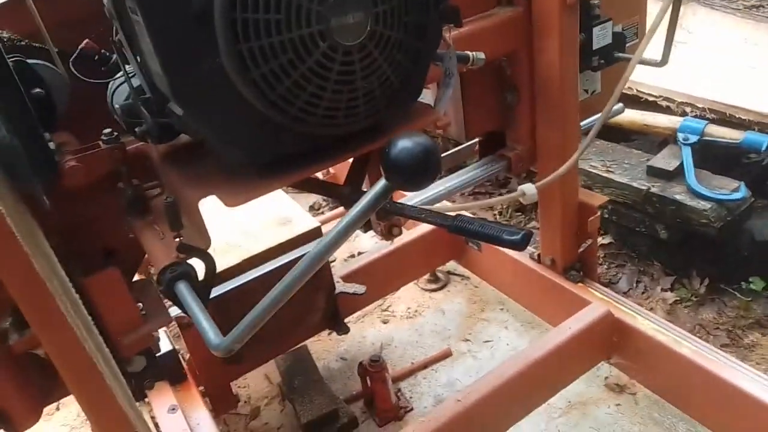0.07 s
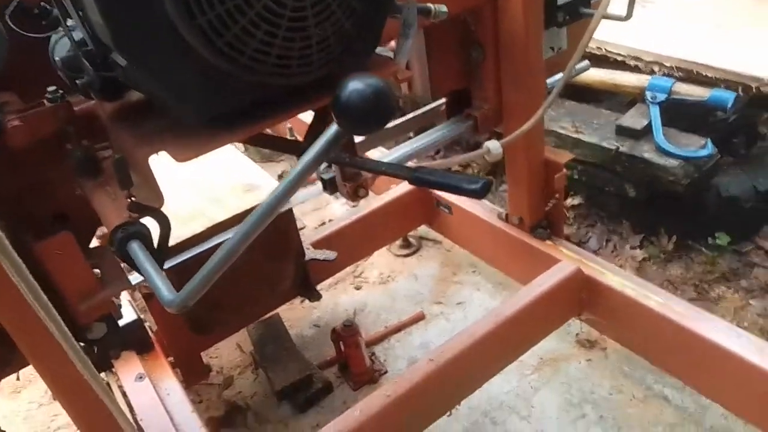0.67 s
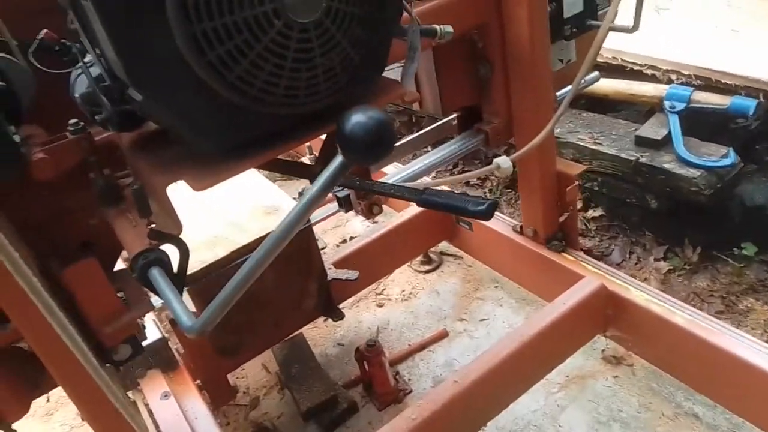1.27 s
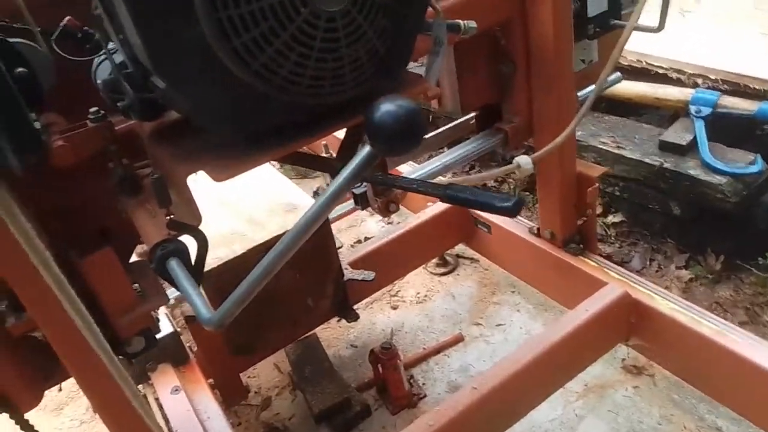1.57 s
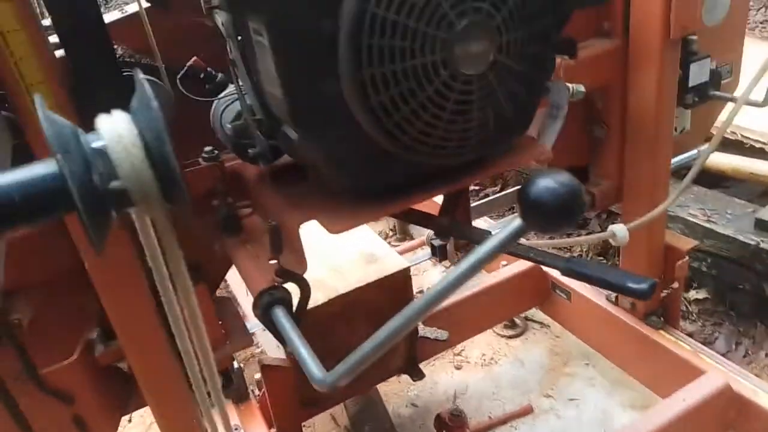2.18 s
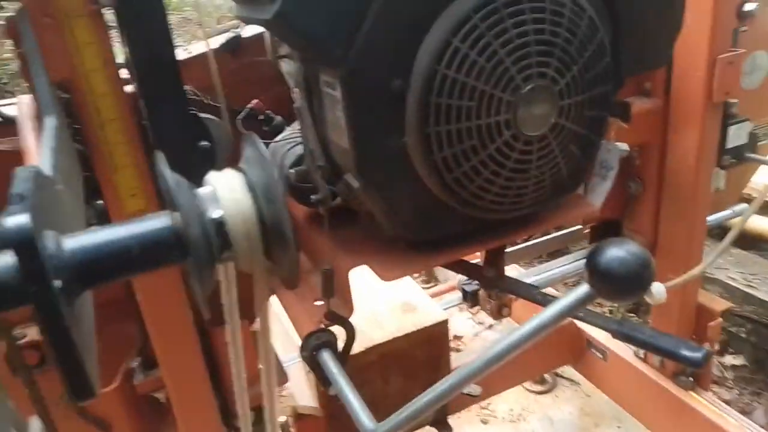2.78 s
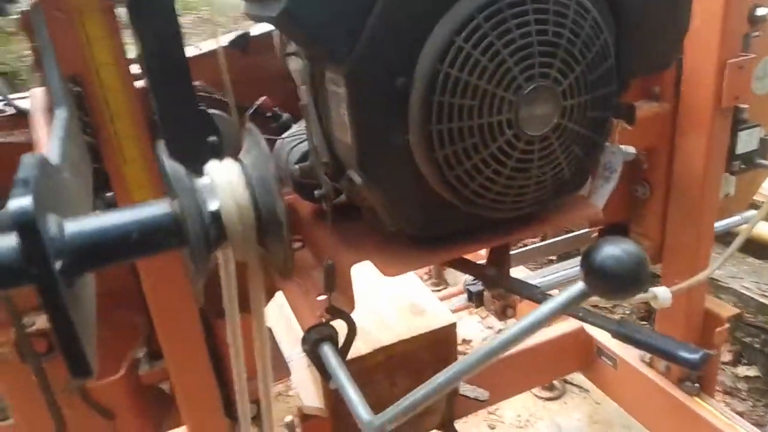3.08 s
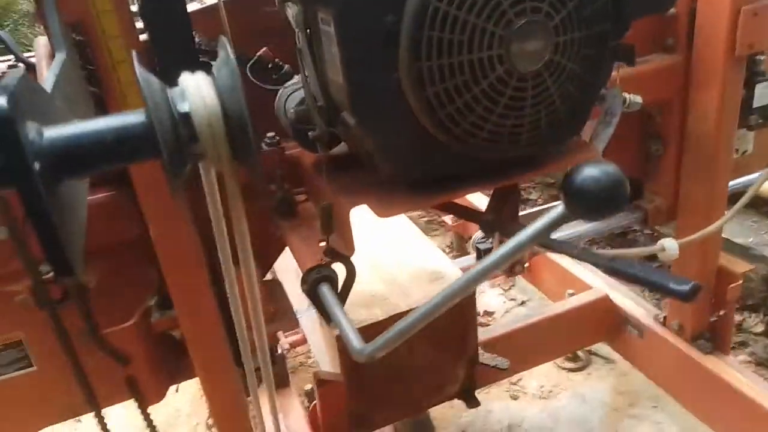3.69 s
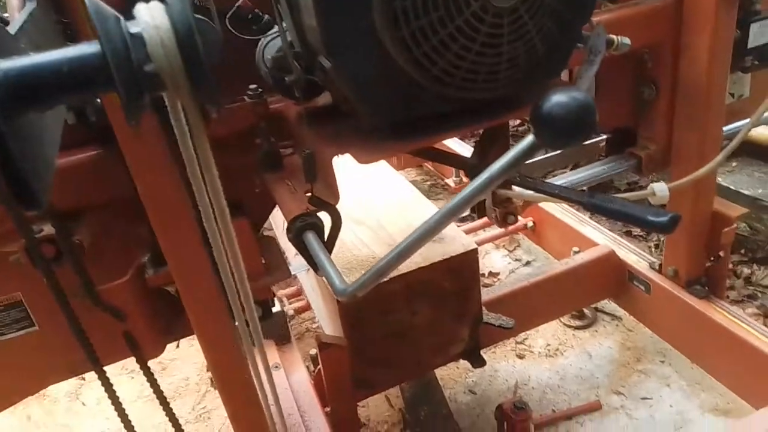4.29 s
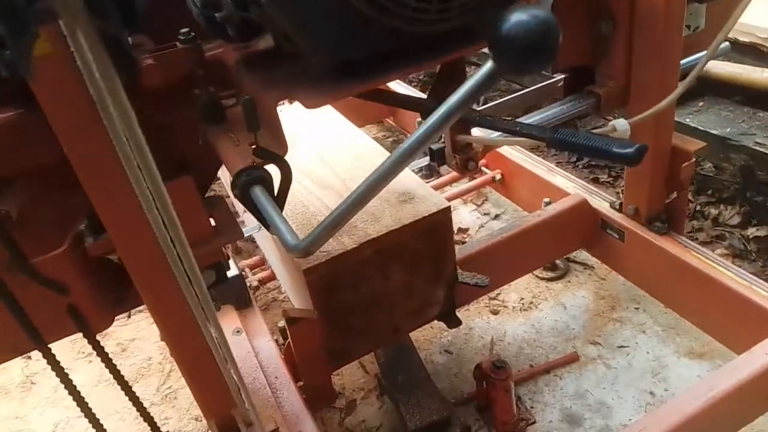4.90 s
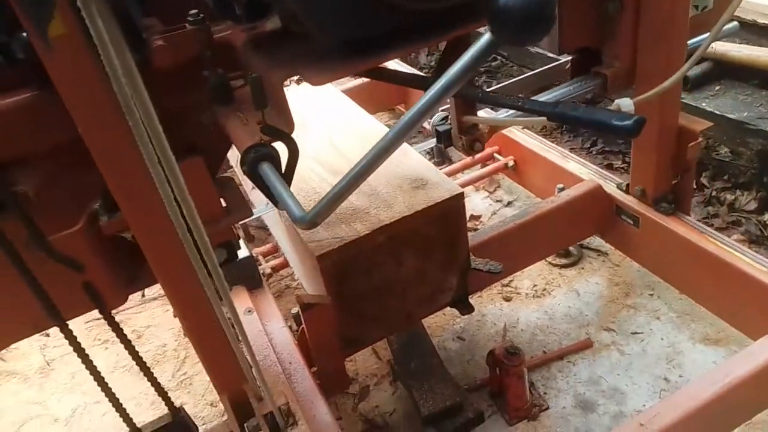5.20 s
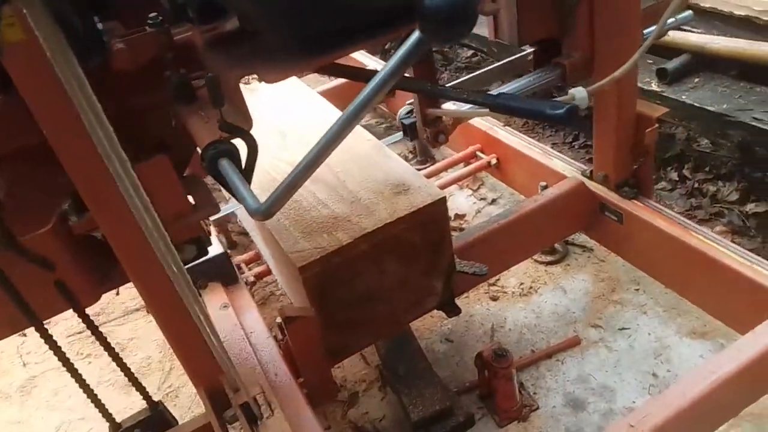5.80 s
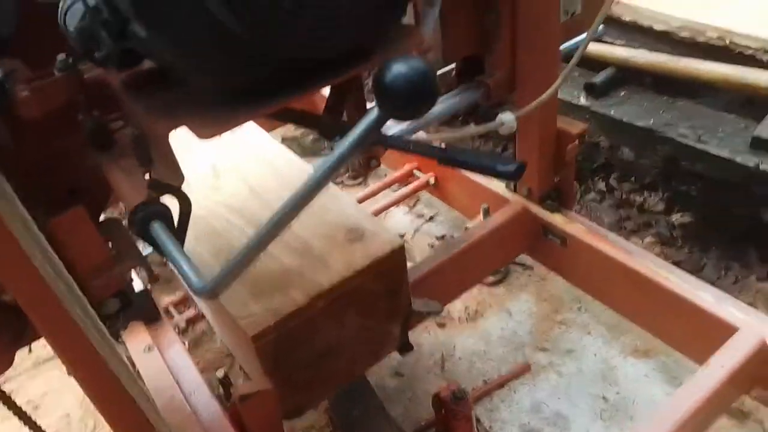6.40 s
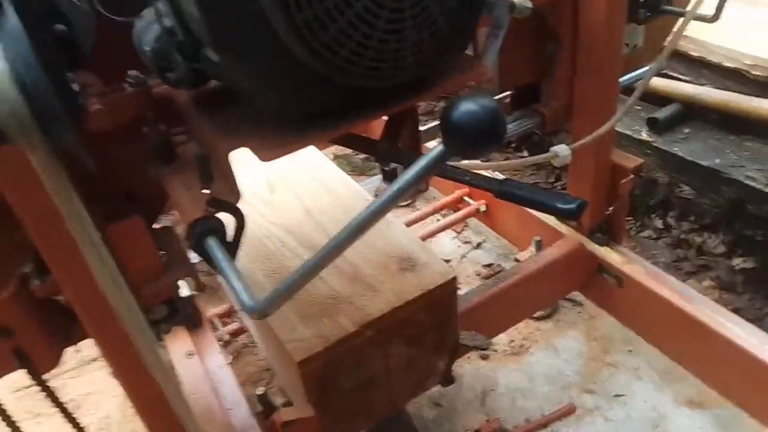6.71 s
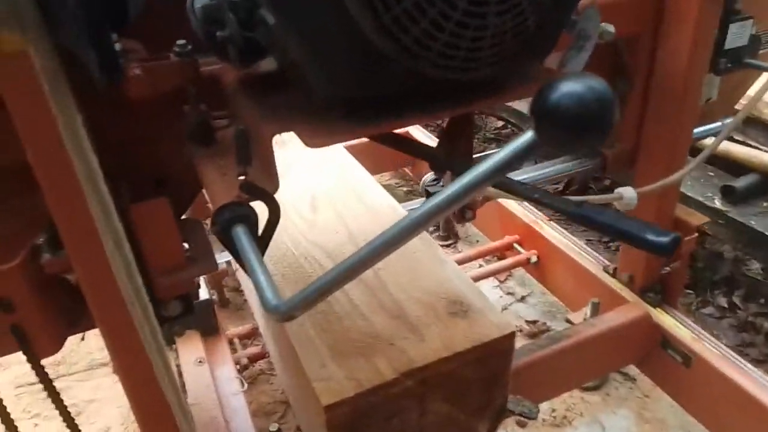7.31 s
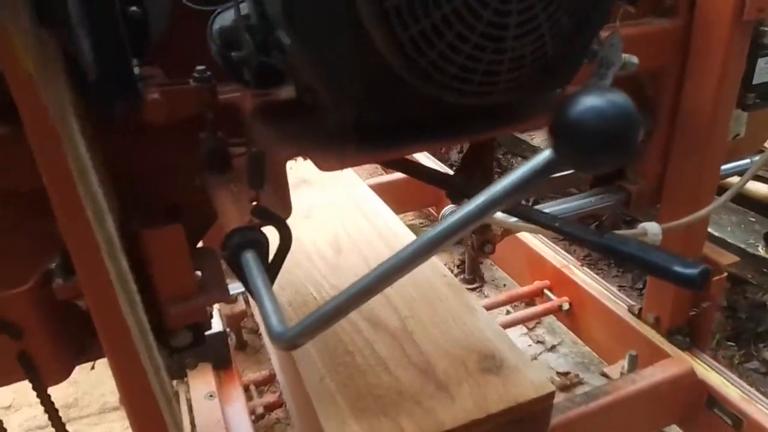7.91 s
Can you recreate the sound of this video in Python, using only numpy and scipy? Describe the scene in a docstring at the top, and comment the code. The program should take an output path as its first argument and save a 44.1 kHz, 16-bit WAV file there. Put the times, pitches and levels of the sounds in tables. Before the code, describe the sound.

A petrol engine clatters, then drones under load as a sawmill's band blade bites into wood with a piercing whine and hiss.

```python
"""Bandsaw mill entering a log

A portable bandsaw mill, heard outdoors from beside its twin-cylinder petrol engine, starts a cut.
Friction excites the steel band's bending modes: it whines over its guides and squeals as it enters
the wood, where fracturing fibres add a loud sawing hiss. The governor holds the speed and opens the
throttle, so the loose engine clatter firms into a harmonic exhaust drone."""
import sys
import numpy as np
from scipy import signal
from scipy.fft import rfft, irfft, next_fast_len
from scipy.io import wavfile
from scipy.ndimage import uniform_filter1d

SR = 44100
rng = np.random.default_rng(int(sys.argv[2]) if len(sys.argv) > 2 else 0)


def unload_wav(signal):
    """Save mono or channel-first audio to the path in sys.argv[1] as 16-bit WAV at rate SR, clipped to [-1, 1]."""
    wavfile.write(
        sys.argv[1],
        SR,
        np.round(np.clip(np.atleast_2d(signal).T, -1, 1) * 32767).astype(np.int16),
    )


N = 355005
TIME = np.arange(N) / SR
ENTRY_S = 1.55  # the load is half-way up as the band enters the log

# feed into the log: (time [s], level of the teeth at full load [dB])
FEED_LEVELS = [(0, -11), (1.4, -16), (2.3, -16.5), (3.6, -14.5), (4.3, -17), (5.8, -17), (6.8, -17),
               (8.05, -17)]
# spectrum of tearing wood: (frequency [Hz], relative level [dB])
TEARING_SPECTRUM = [(2500, -44), (3500, -10.5), (4350, -7), (5200, -7.5), (6000, -5), (6900, 0),
                    (7900, 1.5), (8800, -0.5), (9400, 3), (9900, -5), (10800, -7), (12500, -10.5),
                    (14000, -6), (16000, -12)]
def teeth(cycle, load, laps_per_cycle=0.21):
    """Fracture noise: countless tiny breaks of fibre merge into a hiss that swells once per band lap."""
    level_db, = curves(FEED_LEVELS)
    lap = laps_per_cycle * cycle
    grain_db = 0.5 * walk(1500) + 0.38 * np.sin(2 * np.pi * lap) + 0.64 * walk(25)
    return undb(level_db) * np.sqrt(load) * colour(noise() * undb(grain_db), TEARING_SPECTRUM)


# friction on the band: (time [s], base level of the main mode [dB], base level of the whine [dB])
FRICTION_LEVELS = [(0, -21.5, -21), (.45, -21.5, -20.5), (.7, -22, -22), (1.0, -22, -20),
                   (1.45, -17.5, -18), (1.75, -20.5, -16.5), (2.2, -19, -18.5), (2.62, -14, -16),
                   (3.0, -23, -19.5), (3.7, -20, -18), (4.2, -24, -17), (4.55, -26, -18.5), (5.1, -24, -17),
                   (5.5, -28, -17), (6.25, -25, -17), (6.8, -21, -15.5), (7.3, -21, -16.5),
                   (7.65, -26, -18.7)]
def band_friction(load, main_hz=8345, screech_hz=8525, rise_hz=160.6, buried_s=4.6):
    """Stick-slip friction drives the band's modes, damped by the wood, and a screech rising with depth."""
    main_db, whine_db = curves(FRICTION_LEVELS)
    whine = undb(whine_db - 1.6 * load) * bending_modes()
    depth = np.clip((TIME - ENTRY_S) / (buried_s - ENTRY_S), 0, 1)
    screech = undb(whine_db - 5.5) * sing(screech_hz + rise_hz * depth, wander_hz=70.3 + 109.3 * load)
    main_mode = unit(ring(noise(), main_hz, width_hz=100) + 1.4 * sing(main_hz, wander_hz=36.03))
    grip_db = 0.8 * walk(14)
    whistle = undb(main_db + grip_db - 2.0 * load) * main_mode + screech
    return whine, whistle


# bending modes of the band: (frequency [Hz], bandwidth [Hz], relative level [dB])
BAND_MODES = [(7900, 280, -2.5), (8616, 330, 5), (8800, 110, -10), (8930, 120, -8), (9110, 85, -2.5),
              (9000, 120, -11), (10160, 140, -8), (11270, 70, -8), (13050, 130, -14)]
def bending_modes(flutter_db=0.7, bite_db=1.0):
    """Forced resonance: the modes take turns as the band flutters and swell together as it bites."""
    modes = sum(undb(db - flutter_db * walk(11)) * ring(noise(), hz, width)
                for hz, width, db in BAND_MODES)
    return unit(modes * undb(bite_db * walk(30)))


# pinches by guides or wood: (peak time [s], rise or fall time [s], frequency [Hz], peak level [dB])
PINCHES = [(.3, .6, 11320, -33.5), (.3, .45, 8610, -22.5), (1.17, .22, 8400, -19.5),
           (1.43, .2, 8440, -17.5), (1.56, .15, 8170, -16), (1.58, .12, 7810, -22.5),
           (1.67, .1, 8740, -19.5), (1.75, .25, 11400, -31.5), (2.0, .12, 8340, -20.5),
           (2.15, .15, 6900, -27.5), (2.58, .16, 8420, -18.5), (2.85, .25, 9100, -24.5),
           (3.45, .5, 6900, -28.5), (3.72, .2, 8580, -21), (4.15, .1, 8340, -21), (4.45, 1.0, 4340, -33),
           (4.45, .3, 7620, -27.5), (4.67, .2, 9210, -19.5), (4.7, .5, 6330, -32.5),
           (4.9, 1.0, 10280, -33.5), (5.3, .2, 11300, -31), (5.68, .12, 8720, -21),
           (6.17, .18, 8830, -16.5), (6.5, .2, 8000, -26.5), (6.95, .2, 8500, -22.5),
           (7.1, .9, 4730, -33.5), (7.65, 1.0, 7600, -25.5)]
def squeals():
    """Friction-induced vibration: each pinch swells one mode of the band and lets it go."""
    return sum(undb(db) * swell(s, side_s) * sing(hz, wander_hz=40) for s, side_s, hz, db in PINCHES)


# spectrum of the band sliding in its guides: (frequency [Hz], relative level [dB])
GUIDE_SPECTRUM = [(2000, -23.5), (4500, -7), (6000, -1), (7500, 0), (9500, 0), (11000, -1), (14000, 0.5),
                  (16000, -3)]
def guide_hiss(load, free_db=-20, pressed_db=0.5):
    """Sliding friction makes broadband noise, a little louder as wood presses the band on its guides."""
    level_db = free_db + pressed_db * load + .35 * walk(5.5) + .55 * walk(30)
    return undb(level_db) * colour(noise(), GUIDE_SPECTRUM)


# surges of the light-running clatter: (time [s], level at zero load [dB])
LIGHT_SURGES = [(0, -21), (.25, -21.5), (.52, -21), (.72, -23.5), (.85, -20.5), (1.2, -21.5), (1.55, -22),
                (2.0, -21)]
# clatter and cooling air, running light: (frequency [Hz], relative level [dB])
LIGHT_SPECTRUM = [(15, -80), (25, -50), (97, -15), (150, -13), (180, -8), (216, -7), (319, -6.5),
                  (592, -6.5), (762, -8), (1100, -9), (1480, -10.5), (4560, -12.5), (6000, -17),
                  (7800, -40), (13200, -120)]
# clatter and cooling air under load: (frequency [Hz], relative level [dB])
LOADED_SPECTRUM = [(25, -21), (55, -27), (95, -7.5), (135, -4.5), (190, -2.5), (255, 3), (330, -1.5),
                   (540, -0.5), (700, 1.5), (950, 0), (1750, 1.5), (2700, -3.5), (4300, -2), (9000, -29)]
def engine_clatter(cycle, load, puff_cycles=0.19, loaded_db=-22.9):
    """Amplitude modulation: gas and cooling-air noise swells at each of two unevenly spaced firings."""
    puffs = sum(np.exp(-((cycle - firing) % 1) / puff_cycles) for firing in (0, 270 / 720))
    pulsing = 1 + .18 * puffs
    light_db, = curves(LIGHT_SURGES)
    light = undb(light_db + 0.75 * walk(60.1) + 0.47 * walk(11.9))
    light *= colour(noise() * pulsing, LIGHT_SPECTRUM)
    loaded = undb(loaded_db + 0.72 * walk(50) + 0.13 * walk(7))
    loaded *= colour(noise() * pulsing, LOADED_SPECTRUM)
    return np.sqrt(1 - load) * light + load * loaded


# steady exhaust harmonics: (frequency [multiple of the cycle rate], relative level [dB])
STEADY_HARMONICS = [(2, -17.5), (4, -13.5), (5, -2.5), (6, -15), (9, -12.5), (11, -10.5), (13, -9.5),
                    (14, -9), (23, -12), (24, -6.5), (26, -15), (28, -16), (29, -9.5)]
# exhaust harmonics that swell and ebb: (frequency [multiple of the cycle rate], relative level [dB])
SWELLING_HARMONICS = [(7, -4), (8, -5)]
# their common gain: (time [s], gain at full load [dB])
HARMONIC_SWELLS = [(1.5, -33), (2.2, -33.5), (2.5, -37), (2.8, -37), (3.5, -34), (3.75, -35), (4.0, -36),
                   (4.33, -30), (4.7, -36.5), (5.05, -33), (5.55, -31.5), (5.8, -36), (6.1, -33),
                   (6.75, -37), (7.25, -34), (7.7, -34.5), (8.05, -37)]
def exhaust_drone(cycle, load, steady_db=-32):
    """Periodic gas pulses sound harmonics of the cycle rate, which firm up as the throttle opens."""
    swell_db, = curves(HARMONIC_SWELLS)
    steady = undb(steady_db) * firing_harmonics(cycle, STEADY_HARMONICS)
    swelling = undb(swell_db) * np.sqrt(2) * firing_harmonics(cycle, SWELLING_HARMONICS)
    return load * (steady + swelling)


def firing_harmonics(cycle, orders, jitter_cycles=0.0021, shimmer=0.03):
    """Jitter and shimmer: a harmonic series wavers as firings come early or late, strong or weak."""
    angle = 2 * np.pi * (cycle + jitter_cycles * walk(25))
    tones = sum(undb(db + walk(3)) * np.sin(k * angle + rng.uniform(0, 2 * np.pi)) for k, db in orders)
    return tones * (1 + shimmer * walk(40))


def valve_gear(cycle, level_db=-39.5, size=1024):
    """Periodicity: a metal rattle that repeats on every engine cycle has a dense line spectrum."""
    pattern = rng.standard_normal(size)
    rattle = np.interp(cycle % 1, np.arange(size) / size, pattern)
    spectrum = [(60, -45), (300, -20), (600, 1), (900, -1), (1800, -1), (2800, 0),
                (4400, 13), (7000, -35)]
    return undb(level_db) * colour(rattle, spectrum)


# echoes from engine cover, log, saw head and ground: (delay [ms], gain [ratio])
ECHOES = [(2.7, 0.025), (3.15, 0.035), (4.4, 0.042), (5.3, 0.023), (6.42, 0.076), (7.4, 0.048)]
def reflect(x, sway_ms=.04, sways=9, oversample=4):
    """Comb filtering: short echoes ripple the spectrum; the ripples shift as the microphone sways."""
    n = np.arange(N)
    fine = signal.resample_poly(x, oversample, 1)
    fine_n = np.arange(len(fine)) / oversample
    for ms, gain in ECHOES:
        lag_ms = ms + sway_ms * np.interp(n, np.linspace(0, N, sways), rng.standard_normal(sways))
        x = x + gain * np.interp(n - lag_ms * SR / 1000, fine_n, fine)
    return x


def sing(hz, wander_hz):
    """Self-sustained oscillation: friction keeps up a near-sine whose pitch shakes with tension."""
    pitch = hz + wander_hz * (walk(180) + .5 * walk(20))
    return unit(np.sin(2 * np.pi * np.cumsum(pitch) / SR) * (1 + .3 * walk(120)))


def ring(x, hz, width_hz):
    """Response of one resonance driven by x; rms 1."""
    return unit(signal.lfilter(*signal.iirpeak(hz, hz / width_hz, fs=SR), x))


def colour(x, spectrum):
    """Spectral shaping of x by (frequency [Hz], relative level [dB]) points; rms 1."""
    hz, db = np.transpose(spectrum)
    size = next_fast_len(N)
    bins_hz = np.maximum(np.arange(size // 2 + 1) * SR / size, 1)
    gain = undb(np.interp(np.log(bins_hz), np.log(hz), db))
    return unit(irfft(rfft(x, size) * gain, size)[:N])


def walk(rate_hz):
    """Random modulation: steps drawn at rate_hz and smoothed twice; rms 1."""
    hold = max(int(SR / rate_hz), 1)
    steps = np.repeat(rng.standard_normal(N // hold + 1), hold)
    return unit(uniform_filter1d(uniform_filter1d(steps, hold), hold)[:N])


def swell(peak_s, side_s):
    """Raised-cosine envelope from 0 to 1 and back, each side lasting side_s."""
    return np.cos(np.pi / 2 * np.clip((TIME - peak_s) / side_s, -1, 1)) ** 2


def curves(table):
    """Linear interpolation of each column of (time [s], ...) rows at every sample."""
    times, *columns = np.transpose(table)
    return [np.interp(TIME, times, column) for column in columns]


def noise():
    """Gaussian white noise."""
    return rng.standard_normal(N)


def undb(db):
    """Decibels to amplitude ratio."""
    return 10 ** (np.asarray(db) / 20)


def unit(x):
    """Normalisation to an rms of 1."""
    return x / np.sqrt(np.mean(x ** 2))


def scene(free_load=0.042, entry_ease_s=.22, governed_hz=30.07, hunt_hz=.04, sag_hz=.38):
    """Superposition of saw and engine in the open air; the load of the cut drives both."""
    load = free_load + (1 - free_load) / (1 + np.exp((ENTRY_S - TIME) / entry_ease_s))
    # four-stroke cycle rate: the governor hunts slightly, and the engine labours once in mid-cut
    cycle_hz = governed_hz + hunt_hz * walk(3) - sag_hz * swell(peak_s=5.9, side_s=1.15)
    cycle = np.cumsum(cycle_hz) / SR
    engine = engine_clatter(cycle, load) + valve_gear(cycle)
    sawing = teeth(cycle, load) + guide_hiss(load)
    whine, whistle = band_friction(load)
    tones = whistle + squeals() + exhaust_drone(cycle, load)
    return np.tile(reflect(sawing + whine + engine) + tones, (2, 1))


def record(dry, gain_db=0.5, ceiling=.57, low_hz=40, top_hz=15700):
    """Clipping and band-limiting: the whine overloads one microphone, heard on both channels."""
    clipped = np.clip(undb(gain_db) * dry, -ceiling, ceiling)
    highpass = signal.butter(2, low_hz, "high", fs=SR, output="sos")
    lowpass = signal.ellip(10, .05, 50, top_hz, fs=SR, output="sos")
    return signal.sosfiltfilt(lowpass, signal.sosfilt(highpass, clipped), padtype="constant")


dry = scene()
out = record(dry)
unload_wav(out)
```